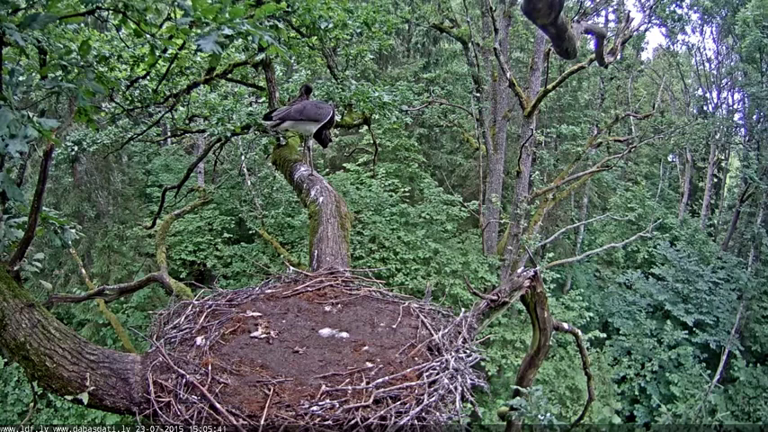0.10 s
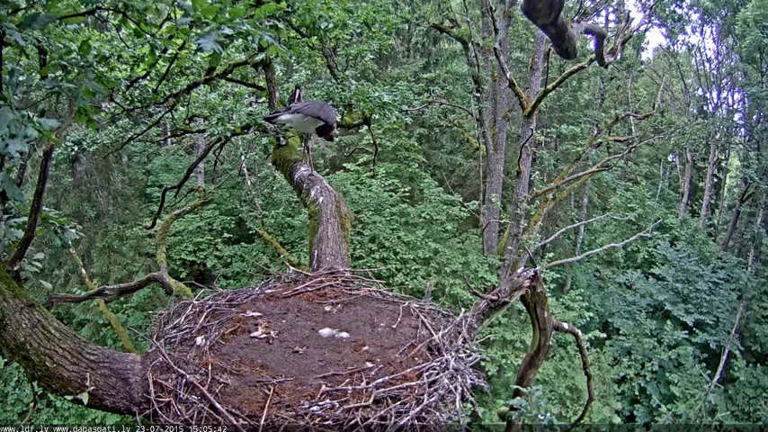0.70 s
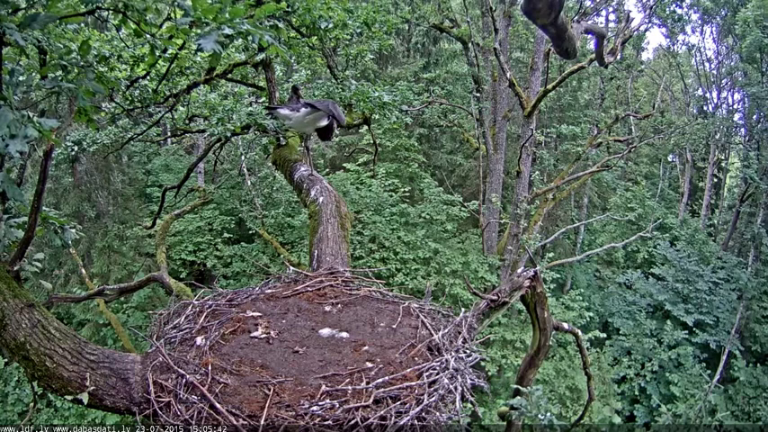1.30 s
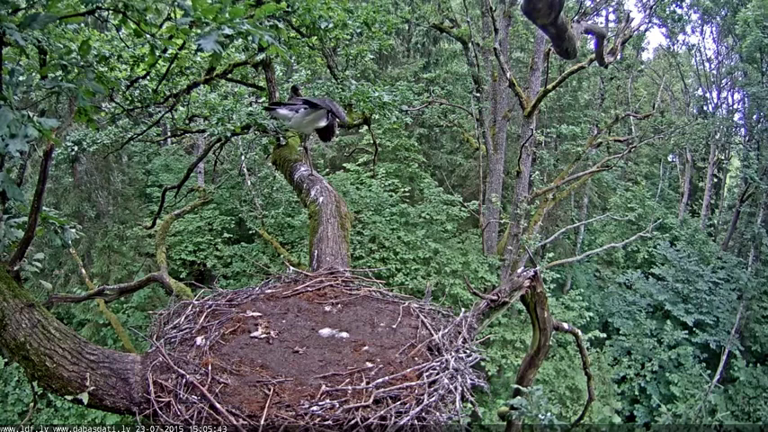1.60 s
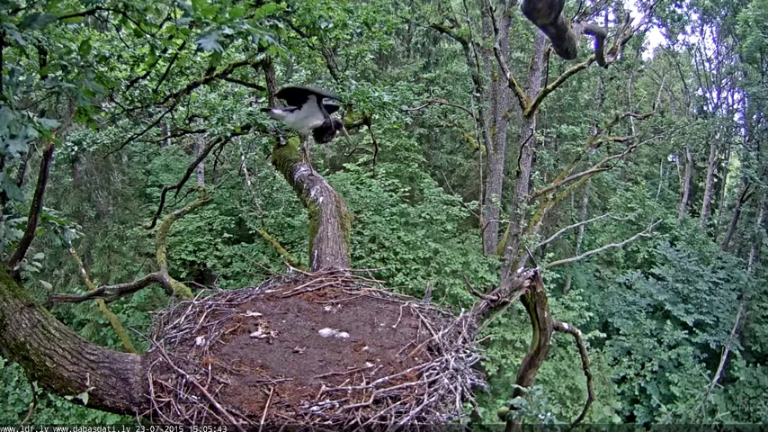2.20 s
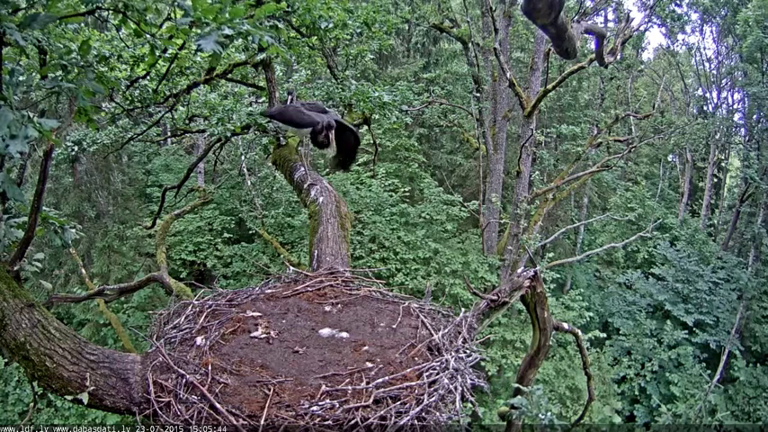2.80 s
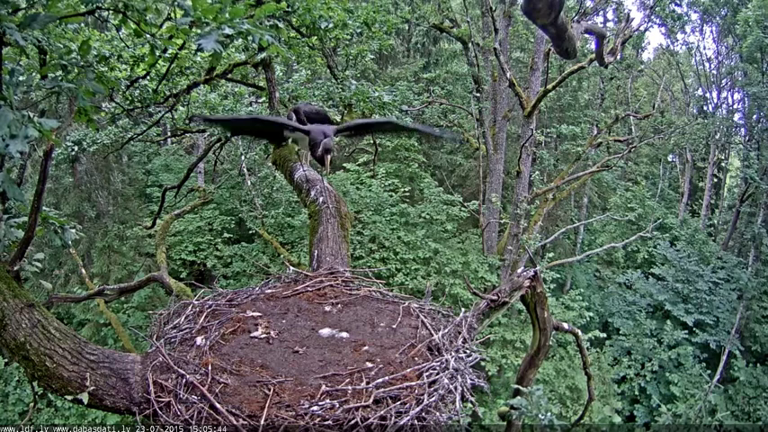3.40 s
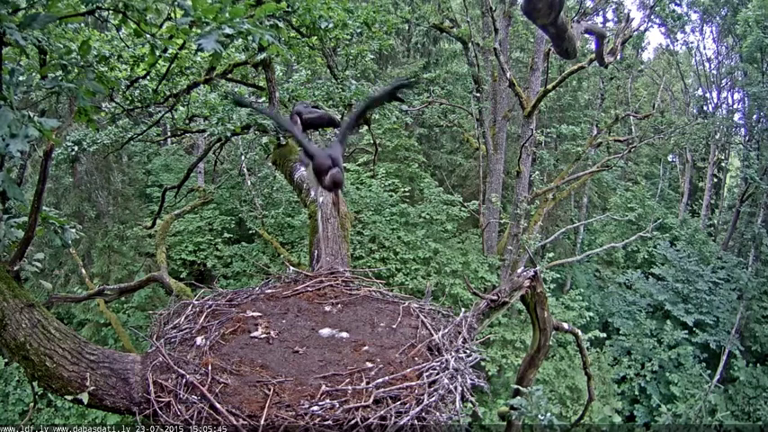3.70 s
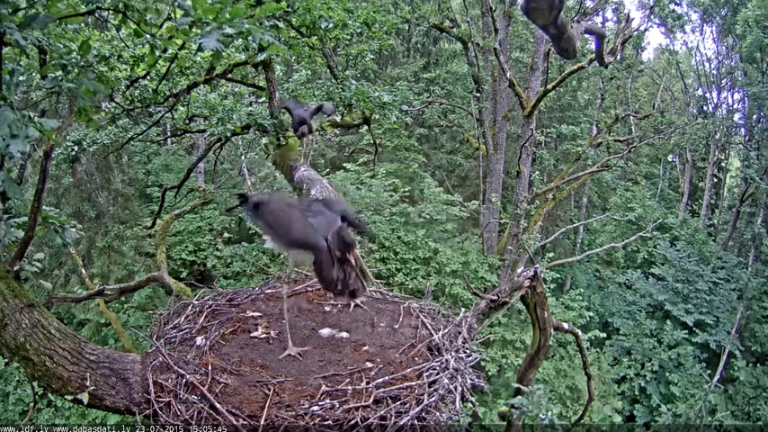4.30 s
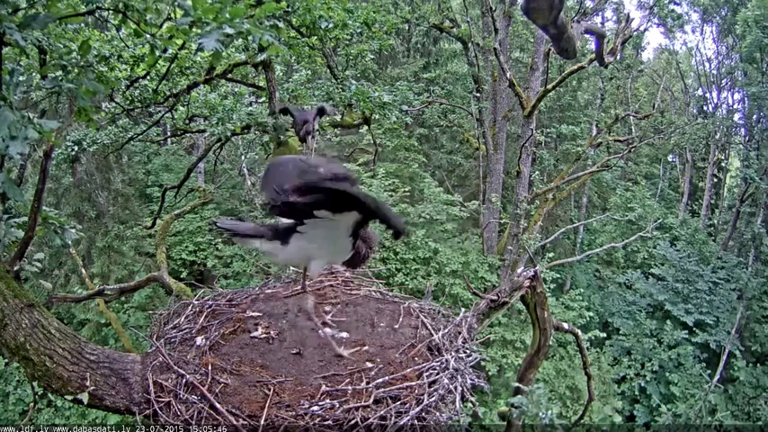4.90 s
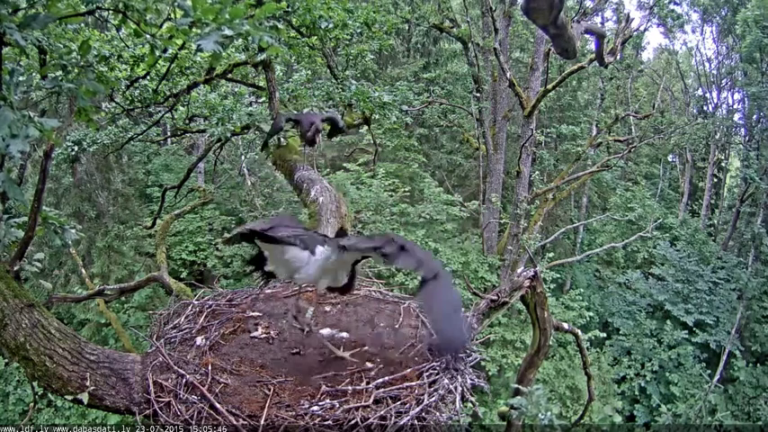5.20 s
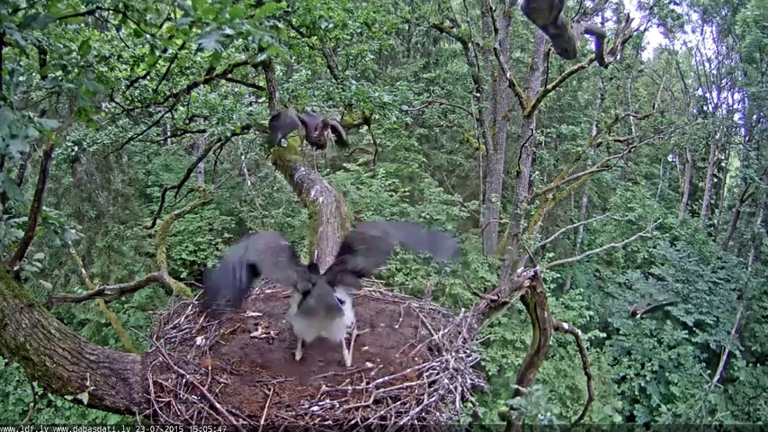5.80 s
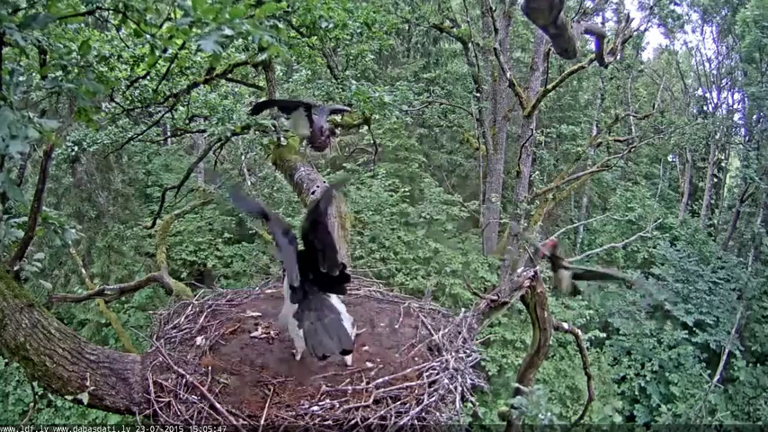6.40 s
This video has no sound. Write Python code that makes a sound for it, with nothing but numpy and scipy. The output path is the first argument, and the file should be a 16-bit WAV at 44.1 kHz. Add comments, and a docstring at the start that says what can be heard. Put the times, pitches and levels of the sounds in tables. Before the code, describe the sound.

Young storks beg in bouts of rapid, harsh, squeaky yelps, with bill clacks and wing flaps over a soft forest hiss.

```python
"""Over a forest hiss, young storks beg on their nest in bouts of about ten harsh yelps a second.
In each yelp the pitch dives from a thin whistle to a rasp and climbs back, squeaking as it crosses
the throat's resonance. Through a bout the mouth opens, holds and closes, and the siblings' wheeze
builds up. Bills clack, and a parent flaps down, its wings brushing the twigs.
Two short delays widen the mono microphone to stereo."""
import sys
import numpy as np
from scipy import signal
from scipy.fft import rfft, irfft, next_fast_len
from scipy.io import wavfile

SR = 44100
rng = np.random.default_rng(int(sys.argv[2]) if len(sys.argv) > 2 else 0)


def transcribe(u):
    """Save the signal u as a 16-bit wav file named by the first command-line argument.

    u: samples, shape (n,) or (channels, n), limited to [-1, 1]; the rate is SR.
    q: integer samples, one column per channel.
    """
    v = np.clip(np.atleast_2d(u).T, -1, 1)
    q = np.round(v * 32767).astype(np.int16)
    wavfile.write(sys.argv[1], SR, q)


N = 282681
BAND_EDGE_HZ = 13100

# (time [s], length [s], rasp level [dB], low pitch [Hz])
YELPS = [(.673, .034, -42.5, 1370), (0.797, .038, -45.5, 1410), (0.928, .031, -44.5, 1436),
         (1.78, .022, -41, 1143), (1.876, .042, -41, 800), (2.001, .031, -39, 704), (2.111, .036, -38, 455),
         (2.214, .042, -35, 647), (2.33, .044, -34, 549), (2.434, .043, -33.5, 428),
         (2.542, .039, -32.5, 409), (2.631, .034, -32.5, 396.5), (2.934, .021, -31, 1168),
         (3.023, .045, -27.5, 1438), (3.131, .034, -26, 1187), (3.237, .034, -28, 437),
         (3.335, .039, -28, 427), (3.424, .059, -29, 387.6), (3.527, .039, -28.5, 1416),
         (3.624, .04, -28, 1396), (3.696, .017, -29, 593), (3.852, .027, -33.5, 1292),
         (3.969, .029, -26, 1415), (4.071, .056, -29, 479), (4.166, .065, -29, 471.7),
         (4.273, .048, -28.5, 1004), (4.337, .036, -29.5, 1404), (4.379, .037, -32, 448),
         (4.422, .054, -30.5, 947), (4.483, .036, -33, 469), (4.564, .036, -30.5, 1294),
         (4.606, .018, -34, 336), (4.85, .039, -28, 1280), (4.964, .035, -28.5, 1385),
         (5.074, .039, -29.5, 1385), (5.188, .036, -28, 1400), (5.293, .043, -28.5, 1400),
         (5.398, .038, -27, 1480), (5.468, .022, -29.5, 1373), (5.492, .014, -32.5, 446),
         (5.553, .033, -40.5, 1580), (5.74, .017, -36, 1400), (5.816, .035, -28, 1397),
         (5.932, .035, -28, 1512), (6.031, .036, -29.5, 1424), (6.146, .035, -32, 1523),
         (6.235, .05, -32.5, 1145)]
# (start [s], end [s], widest mouth [x throat frequency], squeak over rasp [dB], final wheeze [dB])
BOUTS = [(0.599, 1.05, 0.96, 12.5, -60), (1.75, 2.657, .98, 8, -48), (2.919, 3.46, 1, 11, -38),
         (3.498, 3.721, 1.036, -1, -42.5), (3.948, 4.6, 1.1, 12, -29.5), (4.831, 5.581, 1.087, 10, -37.5),
         (5.801, 6.397, 1.108, 10.5, -32.5)]


def begging(opening_s=.12, closing_s=.14, bridge_foot_hz=4850, bridge_top_hz=5530):
    """Yelps take mouth and squeak from the nearest bout; a thin whistle bridges short gaps."""
    out = np.zeros(N)
    next_starts_s = [row[0] for row in YELPS[1:]] + [np.inf]
    for (s, length_s, db, low_hz), next_s in zip(YELPS, next_starts_s):
        start, end, widest, squeak_db, _ = min(BOUTS, key=lambda bout: max(bout[0] - s, s - bout[1]))
        opening = np.interp(s - start, [0, opening_s], [.94, 1])
        closing = np.interp(end - s, [0, closing_s], [.87, 1])
        mouth = widest * opening * closing
        climb_s = s + length_s
        add(out, *yelp(s, climb_s, db, db + squeak_db, db + 6.5, low_hz, mouth))
        if .03 < next_s - climb_s < .08:
            foot_hz, top_hz = bridge_foot_hz * mouth, bridge_top_hz * mouth
            at_s, bridge = whistle(climb_s + .012, next_s, foot_hz, top_hz, db - 19.5)
            add(out, at_s, bridge * reach(db) ** 4)
    return out


def yelp(dive_s, climb_s, rasp_db, dive_db, climb_db, low_hz, mouth, flutter_db=3, swell_db=4):
    """The pitch dives through the throat's main resonance, rasps at the bottom and climbs back."""
    t = np.arange(dive_s - .01, climb_s + .03, 1 / SR)
    progress = np.clip((t - dive_s) / (climb_s - dive_s), 0, 1)
    inside = (t > dive_s) & (t < climb_s)
    cross_hz = THROAT_MODES[1][0] * mouth
    knots_hz = [cross_hz, low_hz * 1.17, low_hz * .92, cross_hz]
    pulses, puffs = voice_source(np.exp(np.interp(progress, [0, .25, .75, 1], np.log(knots_hz))))
    flutter = amp(flutter_db * wobble(len(t), 210))
    rasp = shaped((.64 * pulses + .36 * puffs) * flutter, lambda f: throat(f / mouth))
    cutoff_hz = max(BAND_EDGE_HZ * amp(.72 * min(rasp_db + 24, 0)), 3900)  # soft yelps are duller
    rasp = shaped(rasp, lambda f: 1 / (1 + (f / cutoff_hz) ** 8))
    ring = throat_ring(progress, mouth, cross_hz, cutoff_hz)
    gate_s = [dive_s - .004, dive_s - .002, climb_s, climb_s + .011, climb_s + .025]
    gate = np.interp(t, gate_s, [.16, 1, 1, .079, .51])
    push = amp(rasp_db - 2.5 + swell_db * (np.sin(np.pi * progress) - 1.5))
    voice = gate * push * (rasp / np.std(rasp[inside]) + ring / np.std(ring[inside]))
    voice += amp(rasp_db) * chest(pulses, puffs, progress, inside, low_hz)
    voice += squeak(t - dive_s, cross_hz, dive_db, rasp_db, direction=-1)
    voice += squeak(t - climb_s, cross_hz, climb_db, rasp_db, direction=1)
    return t[0], voice * signal.windows.tukey(len(t), .1)


def voice_source(pitch_hz, jitter=.033):
    """Sharp pulses, and a puff of turbulence with each."""
    cycles = np.cumsum(pitch_hz * (1 + jitter * wobble(len(pitch_hz), 357))) / SR
    harmonics = sum(np.cos(2 * np.pi * k * cycles) * (k * pitch_hz < BAND_EDGE_HZ) for k in range(1, 30))
    puffs = (.64 + np.exp(-(cycles % 1) / .24)) * rng.standard_normal(len(cycles))
    return unit_rms(harmonics * np.sqrt(pitch_hz)), unit_rms(puffs)


def squeak(t, cross_hz, db, rasp_db, direction, width_s=.002, skirt_s=.013):
    """The fundamental flares as it crosses the main resonance at t = 0; a climb trails off upward."""
    sweep = .42 * reach(rasp_db) * np.tanh(direction * t / rng.uniform(.00794, .022))
    hz = cross_hz * (1 + sweep) * (1 + .0538 * wobble(len(t), 550))
    flare = amp(db - 2) * np.exp(-(t / width_s) ** 2 / 2)
    skirt = (direction > 0) * amp(rasp_db - 7) * np.exp(-(t / skirt_s) ** 2 / 2)
    return (flare + skirt) * sine(hz)


def reach(db, knee_db=-32):
    """Share of the full squeak sweep; it shrinks for yelps louder than the knee."""
    return np.clip(1 - .05 * (db - knee_db), .2, 1)


# (centre [Hz], width [Hz], gain [dB])
THROAT_MODES = [(2535, 530, 5), (3374, 2200, 5.5), (4363, 350, -8.5)]
# (frequency [Hz], gain [dB])
THROAT_LEAK = [(900, -90), (1700, -52), (3000, -9.5), (5200, -13.5), (6800, -19.5), (8500, -14),
               (10500, -11.5), (11800, -40)]


def throat(hz, cutoff_hz=6180):
    """Gain of three resonances over a weak leak."""
    modes = sum(amp(db) / (1 + (2 * (hz - centre) / width) ** 2) for centre, width, db in THROAT_MODES)
    return curve(THROAT_LEAK, hz) + modes / (1 + (hz / cutoff_hz) ** 12)


def throat_ring(progress, mouth, cross_hz, cutoff_hz):
    """Each resonance sings on a pitch arch; a wide mouth favours the top one."""
    ring, size = 0, len(progress)
    for hz, _, db in THROAT_MODES:
        arch = 1 - .39 * (progress - rng.uniform(.2, .7)) ** 2
        pitch_hz = hz * np.sqrt(mouth) * arch * (1 + .015 * wobble(size, 300))
        tilt = (hz / cross_hz) ** (25 * (mouth - .9))
        strength = tilt * amp(db / 2 + 3.5 * wobble(size, 130))
        ring += strength * sine(pitch_hz) / (1 + (hz / cutoff_hz) ** 10)
    return ring


# (frequency [Hz], gain [dB])
CHEST_RESPONSE = [(200, -12), (370, 15.5), (650, -6), (900, 6.5), (1300, 2.5), (1950, 3.5), (3500, -67)]


def chest(pulses, puffs, progress, inside, low_hz):
    """The chest radiates the low harmonics at the bottom of deep yelps."""
    drive = (.76 * pulses + .24 * puffs) * np.sin(np.pi * progress) ** 2
    body = shaped(drive, lambda f: curve(CHEST_RESPONSE, f))
    return amp(-12) * (420 / low_hz) ** 5 * body / np.std(body[inside])


# (time [s], length [s], top pitch [Hz], level [dB])
SQUEALS = [(3.27, 0.0086, 2900, -12), (3.375, 0.0052, 3170, -13.5), (3.384, .036, 3327, -23),
           (4.017, 0.042, 3245, -27), (4.47, .007, 2980, -17), (4.899, 0.0108, 2910, -23.5),
           (5.185, .005, 3560, -13), (5.29, 0.0049, 3420, -14), (5.396, .005, 3490, -10.5),
           (5.901, 0.011, 3170, -21), (5.929, .005, 3530, -13)]


def squeals():
    """The pitch catches on the throat's main resonance."""
    out = np.zeros(N)
    for s, length_s, top_hz, db in SQUEALS:
        add(out, *whistle(s, s + length_s, .88 * top_hz, top_hz, db))
    return out


def whistle(start_s, end_s, foot_hz, top_hz, db, jitter=.034, flutter_db=4):
    """A thin, unsteady tone on a pitch arch, with a faint octave."""
    u = np.linspace(-1, 1, int((end_s - start_s) * SR))
    hz = (top_hz + (foot_hz - top_hz) * u ** 2) * (1 + jitter * wobble(len(u), 280))
    tone = sine(hz) + .1 * (top_hz / 5530) ** 2 * sine(2 * hz)
    tone *= amp(flutter_db * wobble(len(u), 200))
    return start_s, amp(db - 8.5) * unit_rms(tone * signal.windows.tukey(len(u), .6))


def wheeze(count=2600, cry_s=.012, spread_db=16, air_db=-3, mouth=1.03):
    """The siblings' overlapping cries: tiny squeals and hoarse air through the same throats."""
    chatter, u = np.zeros(N), np.linspace(-1, 1, int(cry_s * SR))
    t = np.arange(len(u)) / SR
    for when, pitch, strength in rng.random((count, 3)):
        hz = 2300 * 2.3 ** pitch
        cry = (1 - u ** 2) * np.sin(2 * np.pi * hz * t)
        add(chatter, when * N / SR, amp(spread_db * strength) * cry)
    source = unit_rms(chatter) + amp(air_db) * rng.standard_normal(N)
    return unit_rms(shaped(source, lambda f: throat(f / mouth))) * wheeze_envelope()


def wheeze_envelope(rise_db=9, attack_s=.018, release_s=.027):
    """The siblings join in through each bout and stop together."""
    t, gain = np.arange(N) / SR, 0
    for start, end, _, _, db in BOUTS:
        swell = amp(db - rise_db * np.clip((end - t) / (end - start), 0, 1))
        attack = np.clip((t - start) / attack_s, 0, 1)
        gain += swell * attack * np.exp(-np.maximum(t - end, 0) / release_s)
    return gain


# (time [s], level [dB])
BILL_CLACKS = [(1.648, -27.5), (2.929, -18), (2.935, -12), (3.726, -21), (3.9534, -10.5), (3.9603, -8.5),
               (4.611, -11), (4.626, -20), (4.7442, -13), (4.772, -12), (4.875, -12), (5.634, -20),
               (5.72, -16.5), (5.872, -15.5)]


def clacks(bill_hz=2390, ring_s=.0015, knock_s=.0016, rattle_s=.0051, attack_s=.00034):
    """Bills snap: two short modes over a hollow knock and a little rattle."""
    out, t = np.zeros(N), np.arange(int(.05 * SR)) / SR
    phase = 2 * np.pi * bill_hz * t
    bill = (np.sin(phase) + .5 * np.sin(1.086 * phase)) * np.exp(-t / ring_s)
    attack = 1 - np.exp(-t / attack_s)
    for s, db in BILL_CLACKS:
        knock = sum(np.sin(2 * np.pi * hz * rng.uniform(.66, 1.18) * t) for hz in (420, 900, 1400))
        knock *= amp(-11) * np.exp(-t / knock_s)
        rattle = amp(-24) * noise(len(t), RUSTLE_SPECTRUM) * np.exp(-t / rattle_s)
        add(out, s, amp(db) * attack * (bill + knock + rattle))
    return out


# (time [s], length [s], rustle [dB], thump [dB])
WING_STROKES = [(3.958, 0.046, -42, -51), (5.629, 0.027, -41.5, -58), (4.722, 0.035, -55, -47),
                (4.766, 0.082, -36, -56), (4.874, 0.035, -37.5, -60), (5.72, 0.038, -42.5, -59),
                (5.754, 0.033, -43.5, -57), (5.869, 0.043, -35, -49.5)]
# feathers: (frequency [Hz], density [dB])
RUSTLE_SPECTRUM = [(150, -33.5), (500, -1), (1300, -1.5), (2500, 3), (4000, -5.5), (7000, -25),
                   (11000, -22.5), (13500, -88)]
# air: (frequency [Hz], density [dB])
THUMP_SPECTRUM = [(40, -25), (130, -3), (280, 0), (600, -7), (1500, -44)]


def wings(grain_db=3.5):
    """Feathers scrape the nest in grains over a soft push of air."""
    out = np.zeros(N)
    for s, length_s, rustle_db, thump_db in WING_STROKES:
        u = np.linspace(0, 1, int(length_s * SR))
        stroke = unit_rms(np.minimum(u / .037, 1) * (1 - u) ** 1.13)
        rustle = unit_rms(noise(len(u), RUSTLE_SPECTRUM) * amp(grain_db * wobble(len(u), 220)))
        thump = noise(len(u), THUMP_SPECTRUM)
        add(out, s, stroke * (amp(rustle_db) * rustle + amp(thump_db) * thump))
    return out


def trees(x, t60_s=1.0, wet_db=-19, echoes_per_s=2000):
    """Trunks and leaves scatter a thin tail."""
    t = np.arange(int(.7 * SR)) / SR
    echoes = rng.standard_normal(len(t)) * (rng.random(len(t)) < echoes_per_s / SR)
    tail = echoes * amp(-60 * t / t60_s) * np.minimum(t / .0062, 1)
    return x + amp(wet_db) * signal.fftconvolve(x, tail / np.linalg.norm(tail))[:N]


# (frequency [Hz], density [dB])
FOREST_SPECTRUM = [(12, -40), (20, -3), (27, -3.5), (131, -3), (296, -7), (349, -7.5), (379, -7.5),
                   (690, -11.5), (1010, -14.5), (2620, -6.5), (5770, -31), (13400, -37)]


def forest(level_db=-49.36, swell_db=.5):
    """Steady hiss of leaves and a distant rumble."""
    return amp(level_db + swell_db * wobble(N, 7.3)) * noise(N, FOREST_SPECTRUM)


def amp(db):
    return 10 ** (np.asarray(db) / 20)


def unit_rms(x):
    return x / np.sqrt(np.mean(x ** 2) + 1e-20)


def sine(hz):
    return np.sin(2 * np.pi * np.cumsum(hz) / SR)


def add(mix, s, sound):
    part = mix[max(round(s * SR), 0):][:len(sound)]
    part += sound[:len(part)]


def curve(points, hz):
    """Gain from (frequency [Hz], level [dB]) points on a log-frequency axis."""
    f, db = np.transpose(points)
    return amp(np.interp(np.log(hz + 1), np.log(f + 1), db))


def shaped(x, gain):
    """Filters x by gain(frequency)."""
    size = next_fast_len(len(x) + 512)
    return irfft(rfft(x, size) * gain(np.fft.rfftfreq(size, 1 / SR)), size)[:len(x)]


def noise(size, spectrum):
    """Shaped noise, rms 1."""
    return unit_rms(shaped(rng.standard_normal(size), lambda f: curve(spectrum, f)))


def wobble(size, hz):
    """Random drift up to about hz, rms 1."""
    return unit_rms(shaped(rng.standard_normal(size), lambda f: np.exp(-(f / hz) ** 2)))


def scene():
    """Voices, bills and wings on the nest, among the trees."""
    nest = wheeze() + begging() + squeals() + clacks() + wings()
    return np.tile(trees(nest) + forest(), (2, 1))


def record(dry, highpass_hz=650, dc_offset=.0038, switch_on_s=.125):
    """Each side adds a delayed, high-passed copy, opposite in sign; then switch-on and band limit."""
    copies = [(.85, .012066), (-.85, .008064)]  # (gain, delay [s])
    f = np.fft.rfftfreq(2 * N, 1 / SR)
    highpass = 1j * f / (highpass_hz + 1j * f)
    combs = np.array([1 + gain * highpass * np.exp(-2j * np.pi * f * s) for gain, s in copies])
    wide = irfft(rfft(dry, 2 * N) * combs)[:, :N] + dc_offset
    wide *= np.arange(N) / SR > switch_on_s
    lowpass = signal.firwin(255, BAND_EDGE_HZ, window=("kaiser", 9), fs=SR)
    return signal.oaconvolve(wide, lowpass[None], "same")


dry = scene()
out = record(dry)
transcribe(out)
```